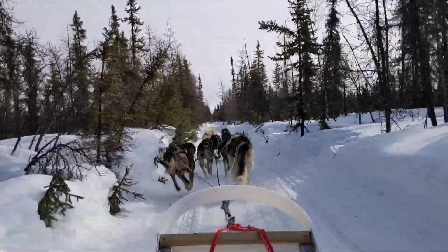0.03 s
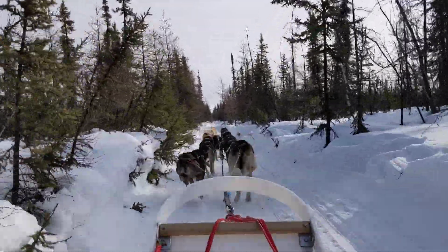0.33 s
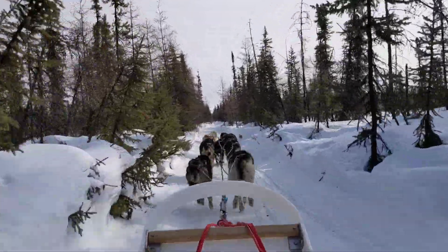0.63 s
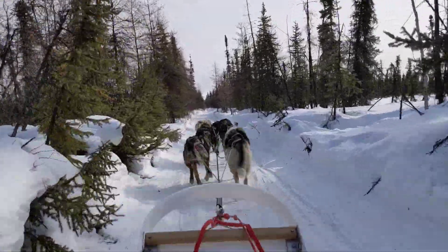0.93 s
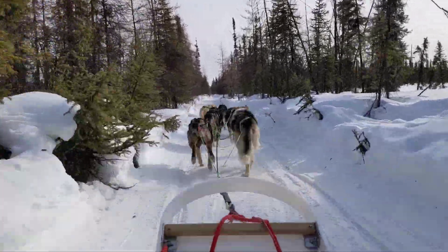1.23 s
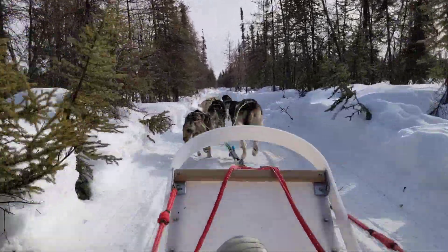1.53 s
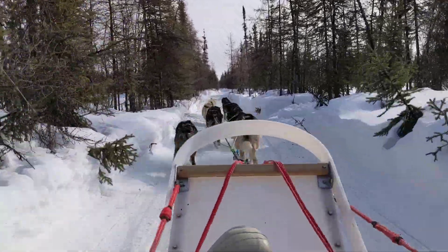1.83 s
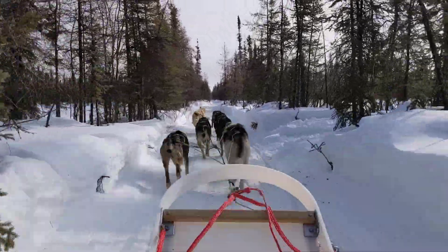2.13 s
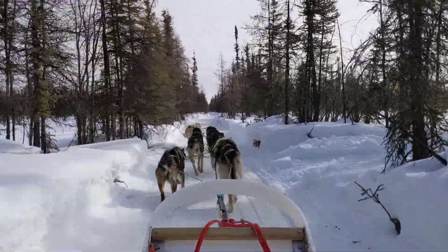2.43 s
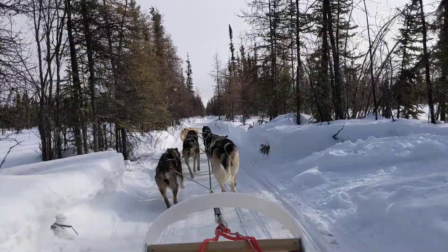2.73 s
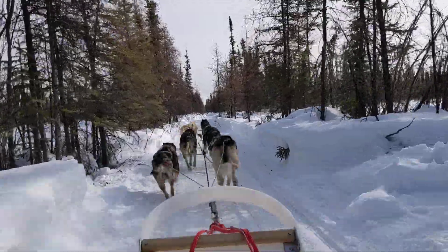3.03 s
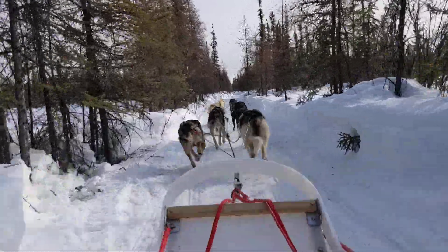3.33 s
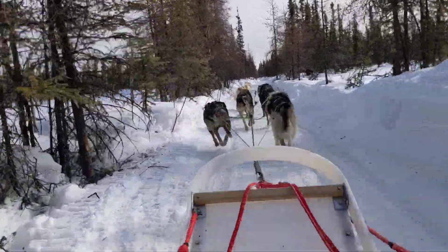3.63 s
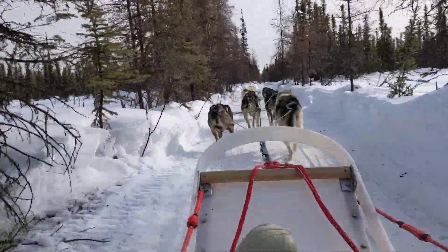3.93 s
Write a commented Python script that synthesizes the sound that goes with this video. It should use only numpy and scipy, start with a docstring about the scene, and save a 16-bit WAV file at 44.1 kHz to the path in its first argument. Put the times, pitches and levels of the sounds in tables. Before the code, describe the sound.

A dog sled glides over packed snow throughout, a low rumble and gritty hiss with wind buffeting the microphone at the seat. Bumps thud repeatedly, hardest near 1.1, 2.1 and 2.6 seconds; the rumble dips briefly after the last two. Crust scrapes around 1 second and from 2.2 to 2.9. The sled hums unsteadily from about 1.3 to 1.7 seconds, and harness snaps clink faintly now and then.

```python
"""A low rumble and a gritty hiss, heard from the seat of a dog sled on a packed snow trail.
Turbulent wind buffets the microphone and the bed shakes, while the runners glide, crush snow crystals
and flick up ice chips. Bumps excite the bed's low modes, the harness hardware clinks faintly and crusty
ridges fracture in short scrapes. Rippled snow briefly drives the bed into a drone, and twice a bump
lifts the runners clear for a moment."""
import sys
import numpy as np
from scipy import signal
from scipy.fft import rfft, irfft
from scipy.io import wavfile
from scipy.ndimage import uniform_filter1d

SR = 44100
rng = np.random.default_rng(int(sys.argv[2]) if len(sys.argv) > 2 else 0)


def unload_audio(sound):
    """Save the sound as a 16-bit wav file, at the path given as the first command line argument."""
    columns = np.transpose(np.atleast_2d(sound))
    # keep every value between -1 and 1, then stretch to whole-number steps
    steps = np.round(np.clip(columns, -1, 1) * 32767)
    wavfile.write(sys.argv[1], SR, steps.astype(np.int16))


N = 176400
TIME_S, BIN_HZ = np.arange(N) / SR, np.arange(N // 2 + 1) * SR / N


def undb(db):
    """Decibels to amplitude ratio."""
    return 10 ** (np.asarray(db) / 20)


def unit(x):
    """Normalise to rms 1."""
    return x / np.sqrt(np.mean(x ** 2))


def curve(rows):
    """Amplitude envelope through (time_s, level_db) points."""
    return undb(np.interp(TIME_S, *np.array(rows).T))


def per_bin(points):
    """Interpolate (frequency_hz, value) points on a log-frequency axis."""
    hz, value = np.array(points).T
    return np.interp(np.log(BIN_HZ + 1), np.log(hz), value)


def colour(x, spectrum):
    """Minimum-phase filtering by the folded cepstrum; rms 1."""
    cepstrum = irfft(np.log(undb(per_bin(spectrum))), N)
    cepstrum[1:N // 2] *= 2
    cepstrum[N // 2 + 1:] = 0
    return unit(irfft(rfft(x) * np.exp(rfft(cepstrum)), N))


def pan(side_db):
    """Two gains with a level difference of side_db, left over right."""
    return undb(np.array([[1], [-1]]) * side_db / 2)


def wander(rate_hz):
    """Smooth random modulation; rms 1."""
    hold = max(int(SR / rate_hz), 2)
    steps = np.repeat(rng.standard_normal(N // 50)[:N // hold + 1], hold)
    return unit(uniform_filter1d(steps, hold)[:N])


def burst(start_s, length_s, attack_s=0.0003):
    """Transient envelope: quick attack, short hold, power-law decay."""
    age = np.maximum(TIME_S - start_s, 0)
    return (1 - np.exp(-age / attack_s)) / (1 + (age / length_s) ** 4)


# likeness of left and right in the rumble: frequency_hz, correlation
RUMBLE_CORRELATION = [(60,0.26),(130,0.47),(640,0.68),(1400,0.11)]
def rumble(spectrum, flicker_db=2.5):
    """Partial coherence: shared and independent noises mix, each swelling unevenly."""
    alike = np.clip(per_bin(RUMBLE_CORRELATION), 0, 1)
    common = rng.standard_normal(N) * undb(flicker_db * wander(45))
    own = rng.standard_normal((2, N)) * undb(flicker_db * np.array([wander(45), wander(45)]))
    mixed = np.sqrt(alike) * rfft(common) + np.sqrt(1 - alike) * rfft(own)
    return colour(irfft(mixed, N), spectrum)


# shaking of the bed: time_s, level_db
BED_LEVEL = [(0,-19.5),(.22,-21),(.35,-19),(.95,-17.5),(1.06,-17.5),(1.13,-18.5),(1.21,-19),(1.29,-16.5),(1.74,-17.5),(2.1,-19),(2.3,-14),(2.58,-16.5),(2.8,-20.5),(2.93,-17),(3.1,-19.5),(3.45,-19.5),(3.55,-15.5),(3.72,-19.5),(4,-14.5)]
# its spectrum: frequency_hz, gain_db
BED_SPECTRUM = [(20,-70),(60,-15.5),(100,-3.5),(150,-0.5),(210,-1),(300,-9),(450,-15.5),(700,-24.5),(1200,-40.5),(3000,-63)]
def bed_shake():
    """Random vibration: the shaking bed radiates low-frequency noise."""
    return rumble(BED_SPECTRUM) * curve(BED_LEVEL)


# gusts on the microphone: time_s, level_db
WIND_LEVEL = [(0,-21),(.5,-19),(1.1,-23),(1.4,-15.5),(2.08,-24.5),(2.5,-18.5),(3.35,-23),(3.7,-18)]
# their spectrum: frequency_hz, gain_db
WIND_SPECTRUM = [(22,-60),(33,-26.5),(50,-8),(78,2.5),(110,-7),(200,-15),(600,-26),(2000,-62)]
def wind():
    """Turbulence: pressure fluctuations at the microphone make a deep buffeting."""
    return rumble(WIND_SPECTRUM) * curve(WIND_LEVEL)


def grains(spread_db, rate_per_s=7000):
    """Shot noise: dense random impulses on each side, mostly small, as of snapping snow crystals."""
    hit = rng.random((2, N)) < rate_per_s / SR
    size = undb(spread_db * np.minimum(rng.exponential(size=(2, N)), 2 * np.pi))
    return unit(hit * size * np.sign(rng.standard_normal((2, N))))


# hiss of the runners: time_s, level_db
GLIDE_LEVEL = [(0,-42.5),(.2,-39),(.45,-43.5),(.62,-40.5),(.75,-44.5),(.9,-39),(.97,-36),(1.02,-46),(1.1,-39),(1.26,-35.5),(1.55,-39),(1.72,-41),(1.88,-48),(2.0,-43.5),(2.1,-48.5),(2.23,-46.5),(2.33,-34.5),(2.52,-46),(2.83,-40),(3.06,-50),(3.3,-39.5),(3.57,-45.5),(3.8,-39.5),(4,-43.5)]
# its spectrum: frequency_hz, gain_db
GLIDE_SPECTRUM = [(800,3.5),(2200,1.5),(3500,-2),(4700,-1),(6500,1.5),(8000,-2.5),(12500,-8),(15500,-16)]
# its direction: time_s, side_db
GLIDE_BALANCE = [(1.5,-1.5),(2.2,-1.5),(2.7,2),(3.1,-8.5),(3.35,1),(3.58,-5),(3.8,5)]
def glide(gain_db=0.5, flicker_db=1.5):
    """Sliding friction: fine snow grains under the runners merge into a hiss."""
    hiss = colour(grains(spread_db=2), GLIDE_SPECTRUM)
    level = curve(GLIDE_LEVEL) * undb(gain_db + flicker_db * wander(50))
    side_db = np.interp(TIME_S, *np.array(GLIDE_BALANCE).T)
    return hiss * level * pan(side_db)


# snow heard through the frame: frequency_hz, gain_db
CRUNCH_SPECTRUM = [(200,-2),(450,4),(750,2),(1250,-1.5),(2000,-10),(3200,-21.5),(6000,-33.5),(15000,-55)]
def crunch(spread_db, shared=0.58):
    """Structure-borne sound: snow grains arrive through the frame dulled, partly alike on both sides."""
    return colour(grains(spread_db) + shared * grains(spread_db)[0], CRUNCH_SPECTRUM)


# snow crushed under the runners: time_s, level_db
CRUSH_LEVEL = [(0,-37.5),(.3,-34.5),(.9,-33.5),(1.01,-37),(1.11,-33.5),(1.26,-28.5),(1.66,-32),(1.8,-38.5),(2.18,-34.5),(2.28,-31),(2.44,-30.5),(2.52,-36.5),(2.72,-31.5),(2.94,-31),(3.03,-39.5),(3.4,-35),(3.8,-30.5)]
def crush(gain_db=2, flicker_db=2):
    """Compaction: snow collapses under the runners with a coarse, stuttering crunch."""
    return crunch(spread_db=3) * curve(CRUSH_LEVEL) * undb(gain_db + flicker_db * wander(110))


def ice_chips(rate_per_s=260, low_hz=4227, high_hz=13250, decay_s=0.0004, gain_db=-9):
    """Damped oscillation: each flicked chip glints at its own pitch; the level follows the hiss."""
    glints, age = np.zeros((2, N)), np.arange(SR // 20) / SR
    for when, pitch, size, side in rng.random((int(rate_per_s * N / SR), 4)):
        start = int(when * (N - len(age)))
        hz = low_hz * (high_hz / low_hz) ** pitch
        ring = np.sin(2 * np.pi * hz * age) * age * np.exp(-age / decay_s)
        glints[int(2 * side), start:start + len(age)] += ring * size ** 2 / hz
    return unit(glints) * curve(GLIDE_LEVEL) * undb(gain_db)


def frame_echoes(x, echo_db=-11.5, echo_s=0.003):
    """Interference: early reflections off the frame ripple each side's spectrum differently."""
    age = np.arange(SR // 50) / SR
    response = rng.standard_normal((2, len(age))) * np.exp(-age / echo_s) * (age > echo_s)
    response *= undb(echo_db) / np.sqrt(np.sum(response ** 2, axis=1, keepdims=True))
    response[:, 0] = 1  # direct sound
    return signal.fftconvolve(x, response, axes=1)[:, :N] / np.hypot(1, undb(echo_db))


# cracking snow: frequency_hz, gain_db
CRACK_SPECTRUM = [(1000,-1),(2200,6.5),(3300,0),(4600,5),(6700,7),(8700,-2.5),(11000,-7),(13000,-6),(15500,-11)]
def crack(spread_db):
    """Impulsive release: abrupt snaps carry energy far into the treble."""
    return colour(grains(spread_db), CRACK_SPECTRUM)


# bumps in the trail: start_s, level_db, side_db, pitch_ratio
BUMPS = [(0.324,-1,15,1.11),(0.505,-2,-5,1.4),(1.123,4,-2,1.04),(1.28,0,-6,1.26),(1.917,-3.5,3,.7),(1.997,-3.5,16,0.85),(2.121,3,0,1.02),(2.645,4.5,1,1.01),(2.926,1,2,1.246),(3.044,-2,11,1.02),(3.165,-2,6,0.51),(3.502,-1.5,9,0.81),(3.533,-3.5,22,1.77),(3.891,1,4,1.06),(3.966,-1,-4,.9)]
# modes of the bed at pitch_ratio 1: frequency_hz, t60_s, level_db
BED_MODES = [(106,0.021,-25),(146.6,0.056,-2),(195.3,0.085,-9),(315,0.012,4)]
def jolts(push_s=0.0053, grind_s=0.016, crunch_db=-32.5, crack_db=-42):
    """Impact excitation: bumps set the bed's low modes ringing and grind the snow beneath."""
    boom, grind = np.zeros((2, N)), np.zeros(N)
    for start_s, level_db, side_db, pitch_ratio in BUMPS:
        age = np.maximum(TIME_S - start_s, 0) * pitch_ratio  # higher also means quicker
        ring = sum(undb(db) * np.sin(2 * np.pi * hz * age) * 1000 ** -np.minimum(age / t60_s, 10)
                   for hz, t60_s, db in BED_MODES)
        push = 1 - np.exp(-np.minimum(age / push_s, 10) ** 2)
        boom += ring * push * undb(level_db) * pan(side_db)
        grind += undb(level_db) ** 2 * burst(start_s, grind_s)
    snow = undb(crunch_db) * crunch(spread_db=0.81) + undb(crack_db) * crack(spread_db=3)
    return 2 * boom + grind * snow


# clinks of the harness: start_s, pitch_hz, level_db
HARNESS_CLINKS = [(.4,11400,-41),(.475,5230,-39),(1.152,6240,-35),(1.282,12600,-39),(2.539,13800,-40),(2.902,12600,-35),(2.92,12400,-32),(3.433,5140,-36),(3.467,5260,-40)]
def harness(length_s=0.011, width_hz=950):
    """Resonance: small metal snaps chatter briefly, each in a band around its own pitch."""
    clinks = np.zeros((2, N))
    chatter = rfft(grains(spread_db=5.5))
    for start_s, pitch_hz, level_db in HARNESS_CLINKS:
        ring = irfft(chatter / (1 + 2j * (BIN_HZ - pitch_hz) / width_hz) ** 2, N)
        clinks += unit(ring) * burst(start_s, length_s) * undb(level_db)
    return clinks


def fractures(start_s, gap_s=0.005, decay_s=0.004):
    """Stepwise failure: the envelope of crust giving way in a quick, uneven train of snaps."""
    snaps_s = start_s + np.append(0, np.cumsum(gap_s * (0.5 + rng.random(20))))
    latest = np.maximum(np.searchsorted(snaps_s, TIME_S, side="right") - 1, 0)
    return 2 * np.exp(-np.maximum(TIME_S - snaps_s[latest], 0) / decay_s)


# scrapes over crust: start_s, length_s, crunch_db, crack_db, side_db
CRUST_RIDGES = [(.913,0.0079,-22.5,-25,0),(0.926,0.0082,-20,-27,3),(0.941,0.015,-23,-58,-3),(1.078,0.0074,-24.5,-23,-1.5),(1.096,0.011,-24.5,-36,-4),(1.463,0.009,-21.5,-47,-6),(1.56,0.0071,-25.5,-36,-2),(1.626,0.011,-24.5,-37.5,0),(2.126,0.017,-32,-36,3),(2.253,0.012,-24,-35.5,2),(2.271,0.0078,-25.5,-32,3),(2.298,0.0018,-43,-24.5,6.5),(2.305,.005,-29,-45,7),(2.324,0.0027,-31,-33,2),(2.337,0.0048,-22.5,-21,4),(2.37,0.0055,-19.5,-41,5),(2.39,0.0019,-46,-25,3),(2.412,0.024,-23,-37,3),(2.465,0.0073,-24,-41,4),(2.483,0.0063,-24.5,-49,0),(2.538,0.02,-29.5,-42,4),(2.647,0.017,-28,-37,3),(2.707,0.0064,-28.5,-42,-3),(2.783,0.011,-25.5,-40,-2),(2.83,0.0098,-26.5,-32.5,-2.5),(2.901,0.024,-36,-38.5,3),(2.92,0.016,-29,-34.5,-3),(3.656,0.0067,-28.5,-36.5,2),(3.748,0.012,-25,-36,7.5)]
# hard crust sounds brighter than loose snow: frequency_hz, gain_db
CRUST_EMPHASIS = [(500,-2),(1250,1.5),(2600,-1.5)]
def scrapes(crunch_gain_db=1.5, crack_gain_db=1):
    """Brittle fracture: crust breaks in short bursts, a dull crunch with a bright crack."""
    dull, bright = np.zeros((2, N)), np.zeros((2, N))
    for start_s, length_s, crunch_db, crack_db, side_db in CRUST_RIDGES:
        envelope = burst(start_s, length_s) * fractures(start_s) * pan(side_db)
        dull += envelope * undb(crunch_db + crunch_gain_db)
        bright += envelope * undb(crack_db + crack_gain_db)
    return dull * colour(crunch(spread_db=2.4), CRUST_EMPHASIS) + bright * crack(spread_db=2.6)


# hum of the bed: time_s, pitch_hz, level_db
BED_DRONE = [(1.25,183,-53),(1.289,182.7,-6.5),(1.351,150,-27.5),(1.41,118.8,-13.5),(1.5,191.7,-14),(1.608,130.4,-17.5),(1.669,157.4,-11),(1.73,165,-54)]
def drone(waver=0.09, flicker_db=2.5):
    """Forced vibration: ripples in the trail keep the bed humming at an unsteady pitch."""
    times_s, hz, db = np.array(BED_DRONE).T
    pitch_hz = np.interp(TIME_S, times_s, hz) * (1 + waver * wander(60))
    level_db = np.interp(TIME_S, times_s, db, left=-np.inf, right=-np.inf) + flicker_db * wander(60)
    return unit(np.sin(2 * np.pi * np.cumsum(pitch_hz) / SR)) * undb(level_db)


# the runners lift clear after two hard jolts: middle_s, half_length_s, dip_db
LIFT_OFFS = [(2.184,0.074,-13.5),(2.701,0.059,-7.5)]
def contact():
    """Loss of excitation: a gain that sinks while the sled is off the snow."""
    return undb(sum(dip_db * np.exp(-((TIME_S - middle_s) / half_length_s) ** 4)
                    for middle_s, half_length_s, dip_db in LIFT_OFFS))


# balance of the two microphone ports: frequency_hz, side_db
PORT_BALANCE = [(30,-12),(60,3),(130,-2),(280,1.5),(1200,2),(1700,2.5),(2300,-2.5),(3200,-7.5),(4500,1),(10000,-0.4)]
def scene(rumble_gain_db=2):
    """Superposition: all sources add at the seat, heard through two ports that differ in colour."""
    low = (bed_shake() + wind()) * undb(rumble_gain_db) * contact() + drone()
    runners = frame_echoes(glide() + crush() * contact() + ice_chips())
    sound = low + runners + scrapes() + jolts() + harness()
    return irfft(rfft(sound) * pan(per_bin(PORT_BALANCE)), N)


def record(dry, cutoff_hz=15900):
    """Soft saturation rounds the highest peaks; a steep low-pass filter cuts the top."""
    rounded = dry / (1 + dry ** 8) ** (1 / 8)
    return signal.sosfilt(signal.ellip(10, 0.2, 80, cutoff_hz, fs=SR, output="sos"), rounded)


dry = scene()
out = record(dry)
unload_audio(out)
```